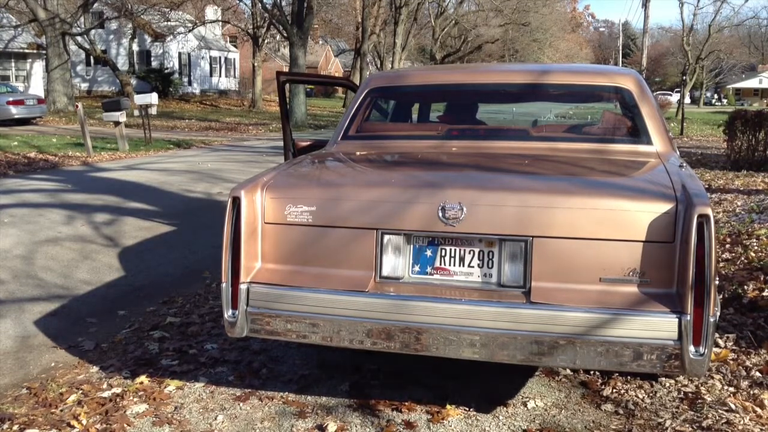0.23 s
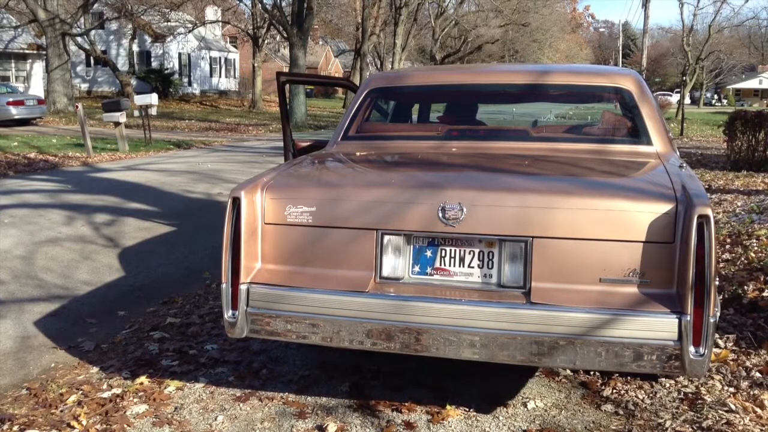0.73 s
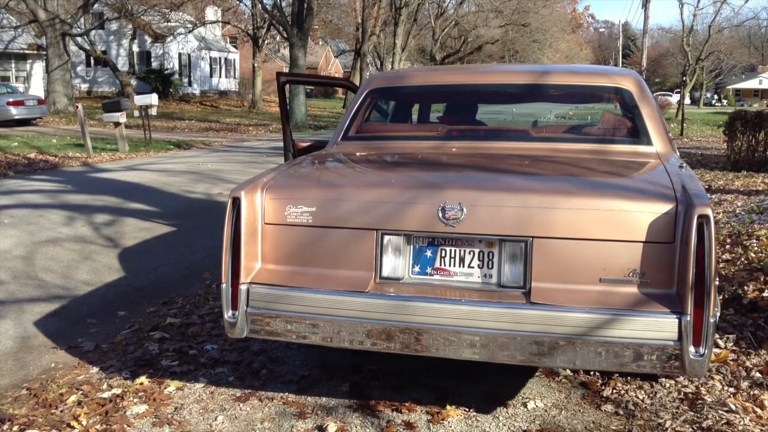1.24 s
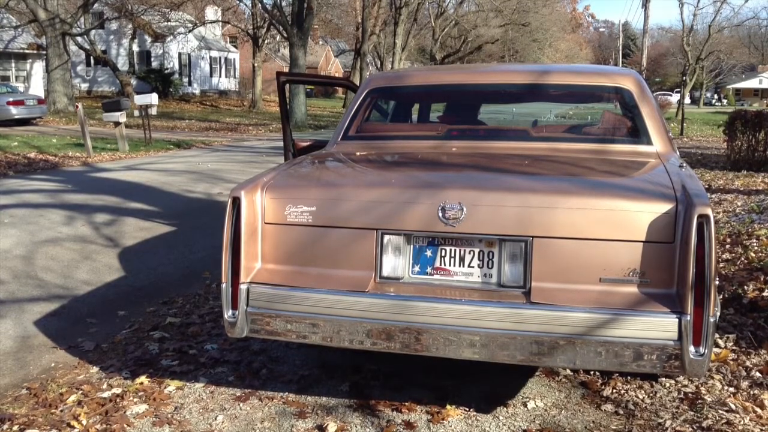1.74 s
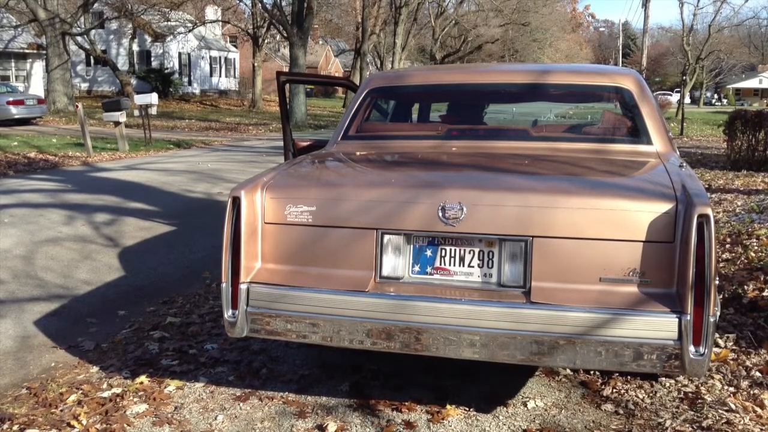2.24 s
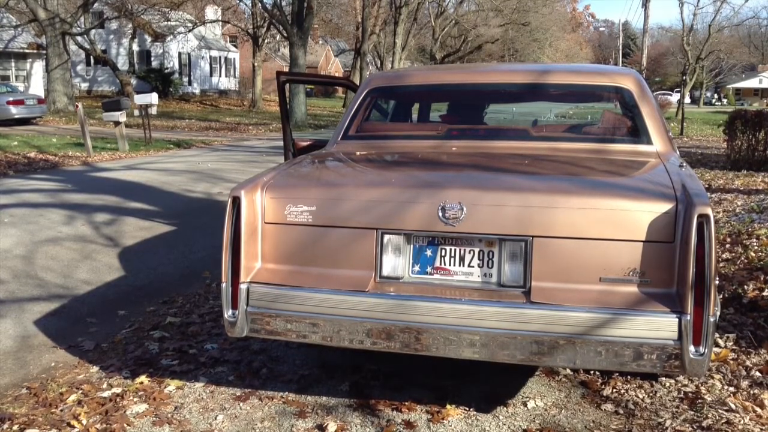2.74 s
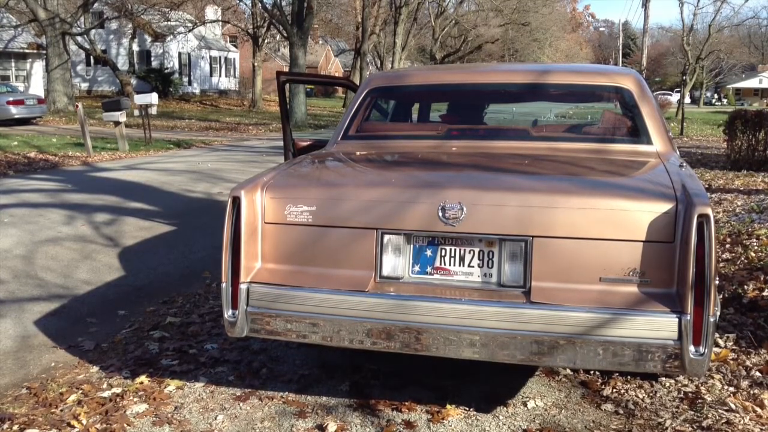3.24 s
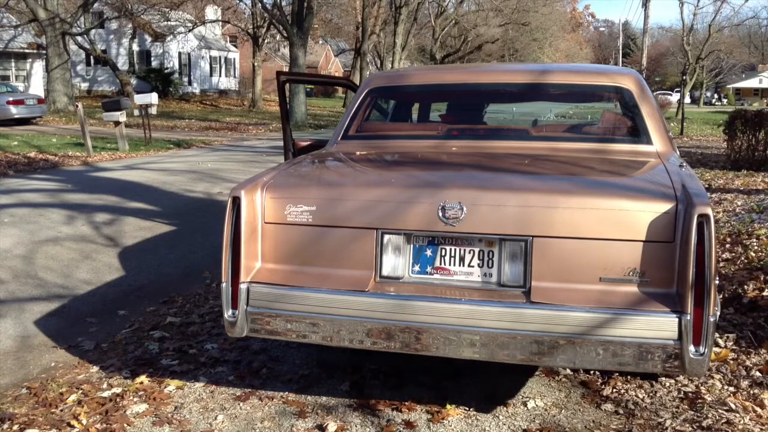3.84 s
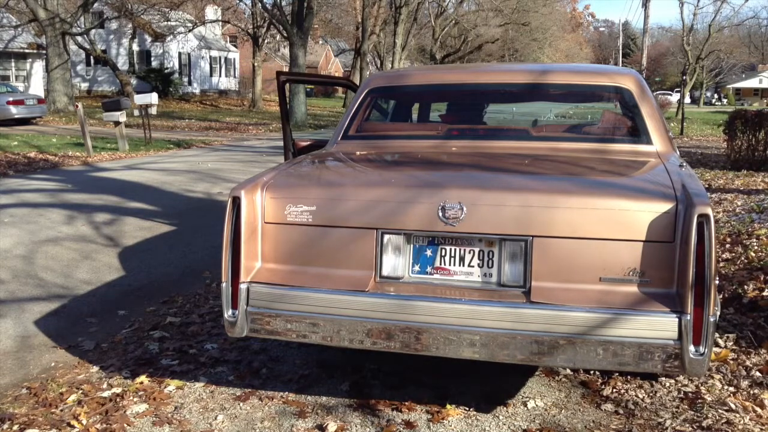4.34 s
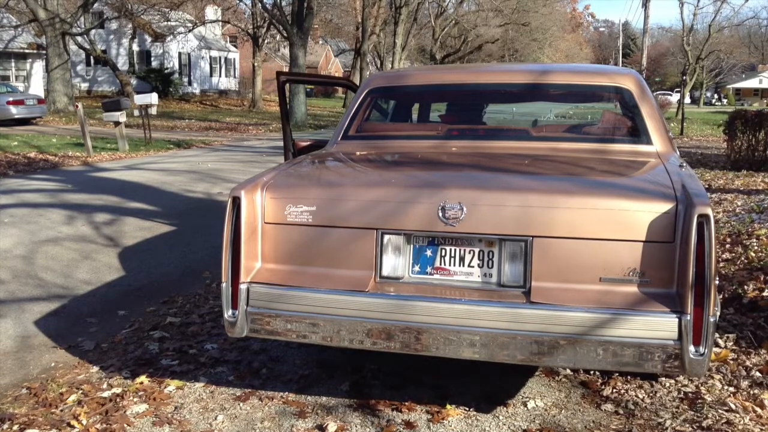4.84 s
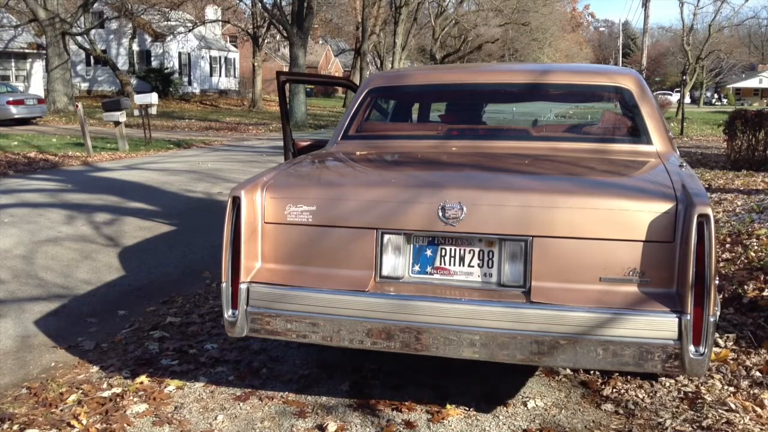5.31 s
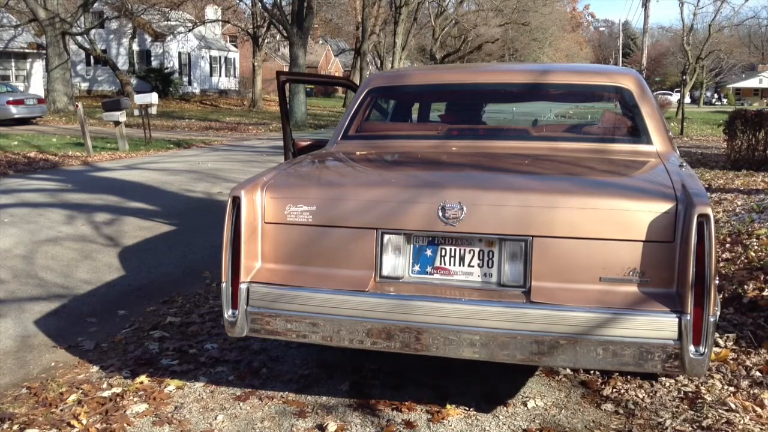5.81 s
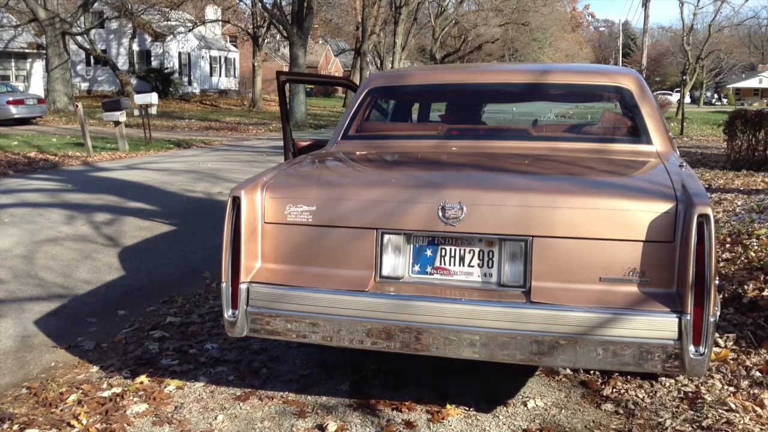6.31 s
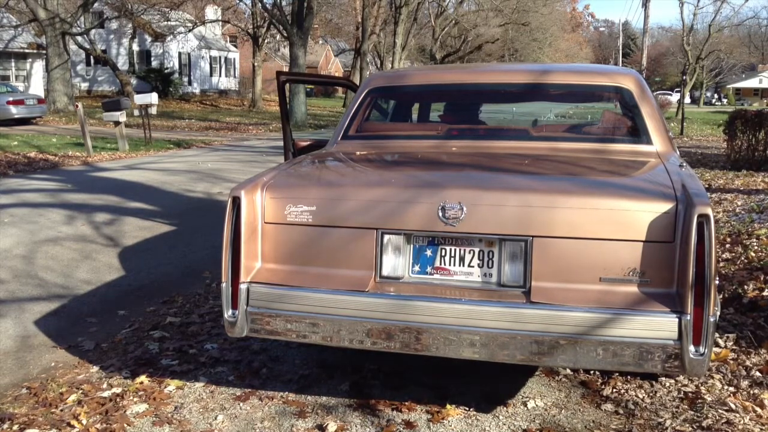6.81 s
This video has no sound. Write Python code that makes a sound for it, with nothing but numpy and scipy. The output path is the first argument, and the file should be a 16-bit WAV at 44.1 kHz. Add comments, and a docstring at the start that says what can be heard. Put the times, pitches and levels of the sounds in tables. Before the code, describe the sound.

Starter teeth chatter and ring against gear and car body, first weakly, then in strong jerky bursts. A pause leaves only low far-off traffic. A metallic clunk, dull thuds and a short groaning panel lead into separate grating bursts mixed with sliding metal. Two last clusters hit hardest, then quiet returns with no engine start. Heard from outdoors near the rear of the car, lightly reflected by the yard.

```python
"""Starter teeth grate in short bursts: an old sedan is cranked on a quiet street and does not catch.
Uneven throbs of tiny tooth impacts ring gear, housing, panels and underbody; hard catches jolt them.
Loose metal clunks, a panel groans and parts scrape: rough contacts feeding narrow resonances.
A thin dull yard tail follows the car; far traffic, shaped noise, hums under it all."""
import sys
import numpy as np
from scipy import signal
from scipy.io import wavfile
from scipy.ndimage import uniform_filter1d

SR = 44100
rng = np.random.default_rng(int(sys.argv[2]) if len(sys.argv) > 2 else 0)


def log_audio(samples):
    """Write samples as a 16-bit WAV file to the path given in sys.argv[1]."""
    # one column per channel
    frames = np.atleast_2d(samples).T
    # limit to full scale, then quantise
    limited = np.clip(frames, -1, 1)
    pcm = np.round(limited * 32767).astype(np.int16)
    wavfile.write(sys.argv[1], SR, pcm)


N = 311341
TIME = np.arange(N) / SR


# bright resonances of the teeth: (centre_hz, width_hz, relative_db)
TEETH_MODES = [(2322, 265, 7.5), (2580, 65, 6), (3326, 48, 4.5), (3830, 47, 1), (4370, 71, -23),
               (6010, 150, -5), (7020, 170, -10)]
# resonances of the underbody: (centre_hz, width_hz, relative_db)
UNDERBODY_MODES = [(78.4, 36, -17.5), (123, 27, -4.5), (156.8, 31, 0.5), (230.2, 43.5, 2), (292, 67, -0.5)]


def starter(throb_hz=85.16, throb_db=4.5, wobble=0.08, wobble_hz=4.62, rumble_db=-1.0):
    """Teeth grate in quick uneven throbs and ring the gear, the panels and the underbody."""
    gear_gain, body_gain, grit_gain, rumble_gain = push_gains()
    gear_jolt, body_jolt, grit_jolt = jolt_gains()
    gear_gain = gear_gain + gear_jolt
    body_gain = body_gain + body_jolt
    grit_gain = grit_gain + grit_jolt
    # the load on the teeth swells and eases at an unsteady rate
    turn = np.cumsum(throb_hz * np.exp(wobble * drift(wobble_hz))) / SR
    throb = np.cos(2 * np.pi * turn)
    teeth = contacts(per_s=1800, spread_db=0.5) * from_db(throb_db * throb)
    teeth_ring = steady(resonate(teeth, TEETH_MODES))
    under_ring = steady(resonate(teeth, UNDERBODY_MODES))
    gear = gear_gain * gear_ring(teeth, body_gain)
    body = body_gain * body_ring(teeth, body_gain)
    grit = grit_gain * tooth_grit(throb, teeth_ring)
    rumble = from_db(rumble_db) * rumble_gain * under_ring
    return gear + body + grit + skim_gain() * teeth_ring + rumble


# starter pushes against the engine: (full_force_s, hold_s, gear_db, body_db, grit_db), before part trims
PUSHES = [(0.0, 0.016, -55, -50.5, -58), (0.086, 0.19, -66.5, -62, -66.5),
          (0.323, 0.062, -53, -56.5, -65.5), (0.483, 0.046, -53.5, -59, -64), (0.565, 0.045, -47, -58, -64),
          (0.685, 0.041, -35, -42.5, -51), (0.759, 0.028, -36, -41.5, -47.5),
          (0.797, 0.051, -37.5, -37.5, -52.5), (2.928, .01, -44, -48.5, -50),
          (2.992, 0.0087, -39.5, -44.5, -48.5), (3.022, 0.036, -40.5, -46.5, -53.5),
          (3.105, .035, -57, -53.5, -58), (3.236, .02, -51, -57, -60), (3.307, 0.1, -57.5, -58, -62),
          (3.581, 0.026, -45, -53, -61.5), (3.689, 0.07, -45, -48.5, -58),
          (3.794, 0.033, -50.5, -48.5, -61.5), (3.945, 0.0045, -54, -54.5, -66.5),
          (4.03, .06, -63, -65.5, -71), (4.241, 0.038, -40, -44, -52.5), (4.31, 0.034, -35.5, -37.5, -51),
          (4.651, .015, -32.5, -35.5, -46.5), (4.723, 0.012, -30.5, -30.5, -45)]
# how each part follows a push: (rise_db_per_s, fall_db_per_s, tail_drop_db, tail_fall_db_per_s)
GEAR_SWELL = (256, 235, 13.8, 85)
BODY_SWELL = (243, 240, 11.3, 65)
GRIT_SWELL = (210, 180, 14.2, 29)
RUMBLE_SWELL = (187, 260, 3.2, 51)


def push_gains(gear_trim_db=-0.5, rumble_ref_db=-41, body_ref_db=-43, rumble_share=0.68):
    """Every push drives gear, body, grit and underbody; each rings on for its own time."""
    times_s, holds_s, gear_db, body_db, grit_db = np.transpose(PUSHES)
    # the underbody shakes with the body, by a share of its swing
    rumble_db = rumble_ref_db + rumble_share * (body_db - body_ref_db)
    gear = from_db(gear_trim_db) * swells(times_s, holds_s, gear_db, *GEAR_SWELL)
    body = swells(times_s, holds_s, body_db, *BODY_SWELL)
    grit = swells(times_s, holds_s, grit_db, *GRIT_SWELL)
    rumble = swells(times_s, holds_s, rumble_db, *RUMBLE_SWELL)
    return gear, body, grit, rumble


# teeth catch hard: (start_s, gear_db, body_re_gear_db, grit_re_gear_db), before part trims
JOLTS = [(0.307, -37, -8, -28), (0.364, -46, -13, -6), (0.515, -35.5, 3, -26), (0.632, -30, -14, -17),
         (0.67, -30, -19, -18), (0.736, -25, 7, -18), (0.761, -27.5, -10, -15), (0.844, -23.5, -7, -31),
         (2.883, -37.5, 10.5, -9), (2.935, -35, -6, -22), (3.055, -44, -17, -27), (3.181, -28.5, -10, -18),
         (3.53, -35.5, -3, -11), (3.744, -30.5, -1, -34), (3.831, -36.5, -15, -33), (4.176, -33.5, -6, -24),
         (4.309, -30, -0.5, -9.5), (4.357, -22, -2, -32), (4.617, -33, -8, -13), (4.647, -21.5, 1, -20),
         (4.705, -20.5, -12, -17)]


def jolt_gains(gear_trim_db=-6.5, body_trim_db=-17.0, grit_trim_db=-6.5, t60_s=0.039):
    """A hard catch jolts gear, body and grit, each swelling quickly and dying away."""
    times_s, gear_db, body_db, grit_db = np.transpose(JOLTS)
    gear = blows(times_s, gear_db + gear_trim_db, t60_s)
    body = blows(times_s, gear_db + body_db + body_trim_db, t60_s)
    grit = blows(times_s, gear_db + grit_db + grit_trim_db, t60_s)
    return gear, body, grit


# resonances of the gear: (centre_hz, width_hz, relative_db)
GEAR_MODES = [(875, 37, -11), (925, 29, -3.5), (982, 32.3, 3.5), (1075, 29, 1), (1159, 100, -9.5),
              (1090, 740, -26.5)]
# resonances of the starter's housing: (centre_hz, width_hz, relative_db)
HOUSING_MODES = [(1337, 28, 6), (1438, 42, -4), (1516, 26, 0.5)]


def gear_ring(teeth, body_gain, housing_db=-10.5):
    """Tooth impacts ring the gear; the housing rings along, slightly more under a hard push."""
    housing = under_load(body_gain, full_db=-30.0, slope=0.15) * steady(resonate(teeth, HOUSING_MODES))
    return steady(resonate(teeth, GEAR_MODES)) + from_db(housing_db) * housing


# broad resonances of the body: (centre_hz, width_hz, relative_db)
BODY_MODES = [(347.3, 48.5, 1), (406, 53, -0.5), (628.3, 17, -4), (682, 60, -4.5), (545, 300, -14.5)]
# resonances of a large panel: (centre_hz, width_hz, relative_db)
PANEL_MODES = [(474, 23, -11.5), (491.2, 17, -6)]


def body_ring(teeth, body_gain, panel_db=1.0):
    """Tooth impacts drone in the body; a large panel booms along, more under a hard push."""
    panel = under_load(body_gain, full_db=-34.0, slope=0.42) * steady(resonate(teeth, PANEL_MODES))
    return steady(resonate(teeth, BODY_MODES)) + from_db(panel_db) * panel


# spectrum of tooth grit: (frequency_hz, relative_db_per_hz)
GRIT_SPECTRUM = [(1200, 2.5), (1700, 9), (2000, 4), (2350, 2), (2900, 7), (3700, 4), (4800, 1.5),
                 (6500, 0.5), (9500, -5), (15000, -7.5)]


def tooth_grit(throb, teeth_ring, throb_db=0.1, teeth_db=-5.5):
    """Fine grains of rubbing, throbbing slightly, plus the bright ring of the teeth."""
    grains = coloured(lambda: contacts(per_s=7000, spread_db=1.0), GRIT_SPECTRUM, patchy_db=1.5)
    return grains * from_db(throb_db * throb) + from_db(teeth_db) * teeth_ring


# teeth skim before they mesh: (full_s, hold_s, level_db); full_s is when the swell reaches full level
SKIMS = [(0.642, 0.046, -60.5), (2.893, 0.035, -55), (4.223, 0.047, -62), (4.611, 0.049, -54.5)]


def skim_gain():
    """Skimming contact lets the teeth ring brightly in short swells."""
    return swells(*np.transpose(SKIMS), rise_db_per_s=500, fall_db_per_s=350)


# metal parts knock: (start_s, ring_db, thud_db, crack_db)
CLUNKS = [(2.467, -37.5, -43.5, -46.5), (2.53, -48, -55, -43), (2.539, -40, -34, -42),
          (2.561, -66, -60, -59), (2.682, -69, -41, -57), (2.923, -52, -37, -58),
          (3.177, -46, -41.5, -46.5), (3.241, -56, -49, -59), (4.148, -64, -50, -63),
          (4.389, -56, -50, -62)]
# resonances of the loose metal: (centre_hz, width_hz, relative_db)
METAL_MODES = [(690, 87, -34), (1093, 56, -1.5), (1194, 64, -3), (1624, 51, 3.5), (1777, 22, 5),
               (2490, 53, -6), (3040, 240, -4), (3400, 53, -3), (3640, 100, -10), (5500, 62, -13),
               (8260, 250, -28)]
# dull resonances of a knock: (centre_hz, width_hz, relative_db)
THUD_MODES = [(196, 31, 6.5), (270, 85, 5), (476, 39, -4), (720, 84, 0), (805, 70, -2.5)]
# spectrum of the crack: (frequency_hz, relative_db_per_hz)
CRACK_SPECTRUM = [(500, 2), (1000, 0), (1700, -3.5), (3400, -0.5), (5500, -8), (8000, -13.5), (15000, -22)]


def clunks(ring_t60_s=0.087, thud_t60_s=0.18, crack_t60_s=0.21, linger_db=-21.5, linger_t60_s=1.53):
    """Loose parts chatter as they meet: a rough ring that lingers faintly, a thud and a crack."""
    times_s, ring_db, thud_db, crack_db = np.transpose(CLUNKS)
    chatter = contacts(per_s=2500, spread_db=6.0)
    ring_gain = blows(times_s, ring_db, ring_t60_s, attack_s=0.0049)
    ring_gain = ring_gain + blows(times_s, ring_db + linger_db, linger_t60_s)
    ring = ring_gain * steady(resonate(chatter, METAL_MODES), size=600)
    thud_gain = blows(times_s, thud_db, thud_t60_s, attack_s=0.0019)
    thud = thud_gain * steady(resonate(chatter, THUD_MODES), size=600)
    crack_gain = blows(times_s, crack_db, crack_t60_s, attack_s=0.0065)
    crack = crack_gain * coloured(hiss, CRACK_SPECTRUM, patchy_db=6.0)
    return ring + thud + crack


# a panel groans in swells: (full_s, hold_s, level_db), before the overall trim
GROANS = [(2.58, 0.049, -46.5), (2.63, 0.032, -45), (2.75, .025, -48.5), (2.797, 0.016, -46)]
# resonances of the groaning panel: (centre_hz, width_hz, relative_db)
GROAN_MODES = [(336.7, 16, 0.5), (708, 23, -15), (1094, 23, -17), (695, 790, -23.5)]


def groan(trim_db=-1.5):
    """Rubbing keeps a few panel resonances singing, not quite in tune."""
    gain = swells(*np.transpose(GROANS), rise_db_per_s=398, fall_db_per_s=350)
    song = steady(resonate(contacts(per_s=1200, spread_db=5.0), GROAN_MODES))
    return from_db(trim_db) * gain * waver(song, share=0.0128, rate_hz=4.73)


# metal slides on metal: (full_s, hold_s, low_ring_db, high_rasp_db)
SCRAPES = [(2.64, 0.032, -59, -61), (2.766, .08, -69, -64), (3.182, 0.011, -59, -51.5),
           (3.236, 0.017, -65, -52), (3.316, 0.088, -54, -53), (3.439, 0.023, -55.5, -52),
           (3.51, 0.036, -62, -57)]
# low resonances of a scrape: (centre_hz, width_hz, relative_db)
SCRAPE_RING_MODES = [(1090, 110, -5), (1604, 67, 10), (1860, 75, 6), (1860, 2100, -3)]
# high resonances of a scrape: (centre_hz, width_hz, relative_db)
SCRAPE_RASP_MODES = [(2630, 150, 3.5), (3000, 200, 2), (3290, 140, 0.5), (3600, 160, 1.5), (4240, 500, -2),
                     (5130, 290, -7.5), (4230, 6300, -12)]


def scrapes(rise_db_per_s=496, fall_db_per_s=197):
    """Each stroke of sliding metal sounds a low ring and a high rasp."""
    times_s, holds_s, ring_db, rasp_db = np.transpose(SCRAPES)
    ring_gain = swells(times_s, holds_s, ring_db, rise_db_per_s, fall_db_per_s)
    rasp_gain = swells(times_s, holds_s, rasp_db, rise_db_per_s, fall_db_per_s)
    return ring_gain * sliding(SCRAPE_RING_MODES) + rasp_gain * sliding(SCRAPE_RASP_MODES)


def sliding(modes, shift_db=4.0):
    """Dense slips ring a part; each resonance wanders in strength and pitch as the contact moves."""
    slips = contacts(per_s=2500, spread_db=-1.0)
    rings = [resonate(slips, [mode]) * from_db(shift_db * drift(10.7)) for mode in modes]
    return steady(sum(waver(ring, share=0.015, rate_hz=6) for ring in rings))


def yard(x, wet_db=-14.5, t60_s=0.76, dull_hz=5000, delay_s=0.012):
    """Houses and trees scatter a thin, dull tail."""
    t = TIME[:SR]
    tail = rng.standard_normal(SR) * from_db(-60 * t / t60_s) * (t > delay_s)
    tail = tail / np.linalg.norm(tail)
    tail = signal.sosfilt(signal.butter(1, dull_hz, fs=SR, output="sos"), tail)
    return x + from_db(wet_db) * signal.fftconvolve(x, tail)[:N]


# spectrum of the street: (frequency_hz, relative_db_per_hz)
STREET_SPECTRUM = [(15, -83), (25, -49), (81, -26), (103, -18.5), (135, -11.5), (224, 1), (286, -4.5),
                   (318, -10.5), (501, -14.5), (558, -19), (604, -12.5), (769, -17), (856, -19.5),
                   (2070, -33.5), (15000, -41)]


def street(level_db=-54):
    """Far traffic hums: noise strongest in the low bands, each wavering a little."""
    return from_db(level_db) * coloured(hiss, STREET_SPECTRUM, patchy_db=1.14)


def from_db(db):
    """Decibels to gain."""
    return 10 ** (np.asarray(db) / 20)


def rms_one(x):
    """Scale to unit power."""
    return x / np.sqrt(np.mean(x ** 2) + 1e-20)


def drift(rate_hz):
    """Slow random signal of spread 1: low-passed noise, made at SR / 40."""
    pole = np.exp(-2 * np.pi * rate_hz * 40 / SR)
    noise = rng.standard_normal(N // 40 + 2002)
    slow = signal.lfilter([1], [1, -2 * pole, pole * pole], noise)[2000:]  # drop the filter's start
    return np.interp(np.arange(N) / 40, np.arange(len(slow)), rms_one(slow))


def waver(x, share, rate_hz):
    """Let the pitch of a sustained sound wander by a small share."""
    position = np.cumsum(1 + share * drift(rate_hz)) % N
    return np.interp(position, np.arange(N), x)


def hiss():
    """White noise."""
    return rng.standard_normal(N)


def contacts(per_s, spread_db):
    """Tiny impacts at random moments, of uneven size and either sign, at unit power."""
    sizes = from_db(spread_db * np.minimum(rng.exponential(1, N), 4))
    sizes = sizes * rng.choice([-1, 1], N)
    return rms_one(sizes * (rng.random(N) < per_s / SR))


def band(x, low_hz, high_hz):
    """Butterworth band-pass."""
    edges_hz = np.clip([low_hz, high_hz], [10, 12], [0.44 * SR, 0.45 * SR])
    return signal.sosfilt(signal.butter(2, edges_hz, "band", fs=SR, output="sos"), x + 1e-18)


def resonate(x, modes):
    """Parallel resonances of (centre_hz, width_hz, relative_db)."""
    return sum(from_db(db) * band(x, hz - width / 2, hz + width / 2) for hz, width, db in modes)


def coloured(source, spectrum, patchy_db):
    """Third-octave bands wavering singly, neighbours fed by unrelated draws; unit power."""
    draws = [source(), source()]
    edges_hz = 22 * 2 ** (np.arange(30) / 3)
    hz, db = np.transpose(spectrum)
    out = 0
    for k, (low, high) in enumerate(zip(edges_hz, edges_hz[1:])):
        if high > hz[0]:
            level_db = np.interp(np.log(low * high) / 2, np.log(hz), db)
            level_db = level_db + patchy_db * drift(8.8)
            out = out + from_db(level_db) * band(draws[k % 2], low, high)
    return rms_one(out)


def steady(x, size=1500):
    """Even out the power over windows of size samples, leaving the grain."""
    power = uniform_filter1d(uniform_filter1d(x ** 2, size), size)
    return x / np.sqrt(np.maximum(power, 0) + 1e-12)


def under_load(gain, full_db, slope):
    """Share of a resonance excited: grows with the push by a power slope, full at full_db."""
    return np.minimum(gain / from_db(full_db), 1) ** slope


def blows(times_s, levels_db, t60_s, attack_s=0.0018):
    """Envelope that swells quickly at each blow and dies away."""
    kicks = np.zeros(N)
    kicks[np.clip(np.round(times_s * SR).astype(int), 0, N - 1)] = from_db(levels_db)
    rise = np.exp(-1 / (attack_s * SR))
    kicks = signal.lfilter([(1 - rise) ** 2], [1, -2 * rise, rise ** 2], kicks + 1e-18)
    return signal.lfilter([1], [1, -from_db(-60 / (t60_s * SR))], kicks)


def swells(times_s, holds_s, levels_db, rise_db_per_s, fall_db_per_s,
           tail_drop_db=np.inf, tail_fall_db_per_s=0):
    """Gain of events that rise, hold and fall, perhaps into a slower tail; the strongest leads."""
    t = TIME[::40]
    loudest_db = -np.inf
    for full_s, hold_s, level_db in zip(times_s, holds_s, levels_db):
        before_s = np.maximum(full_s - t, 0)
        after_s = np.maximum(t - full_s - hold_s, 0)
        fall_db = np.minimum(fall_db_per_s * after_s, tail_drop_db + tail_fall_db_per_s * after_s)
        loudest_db = np.maximum(loudest_db, level_db - rise_db_per_s * before_s - fall_db)
    return np.interp(TIME, t, from_db(loudest_db))


def scene():
    """The car in its yard, over the hum of the street."""
    car = starter() + clunks() + groan() + scrapes()
    return (yard(car) + street())[None]


def record(dry, cutoff_hz=15300):
    """Cut the top steeply with an elliptic low-pass."""
    return signal.sosfilt(signal.ellip(12, 0.1, 80, cutoff_hz, fs=SR, output="sos"), dry)


dry = scene()
out = record(dry)
log_audio(out)
```